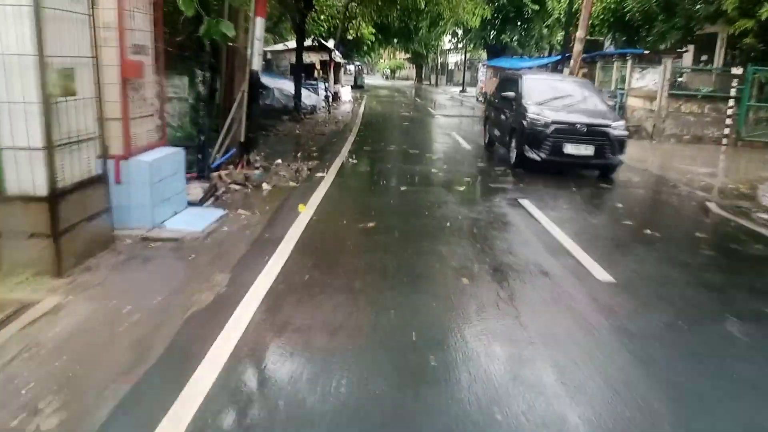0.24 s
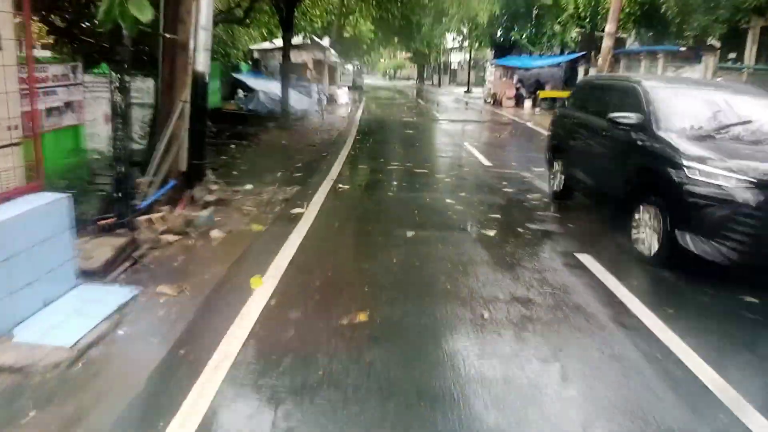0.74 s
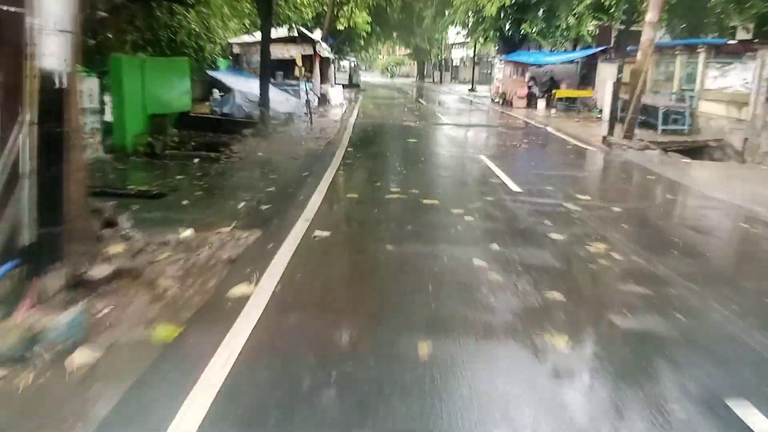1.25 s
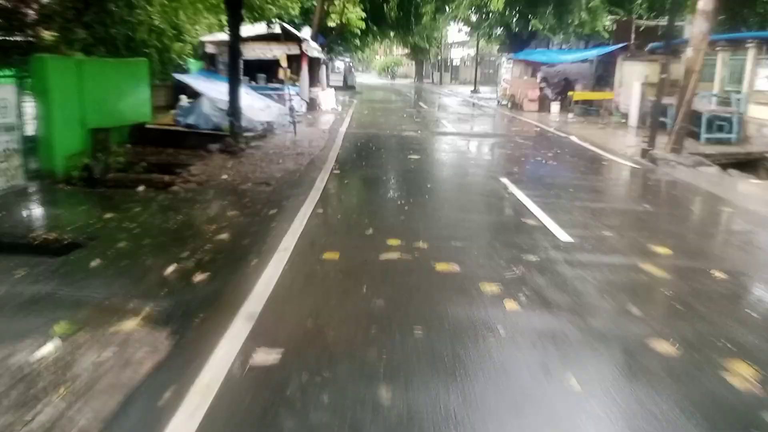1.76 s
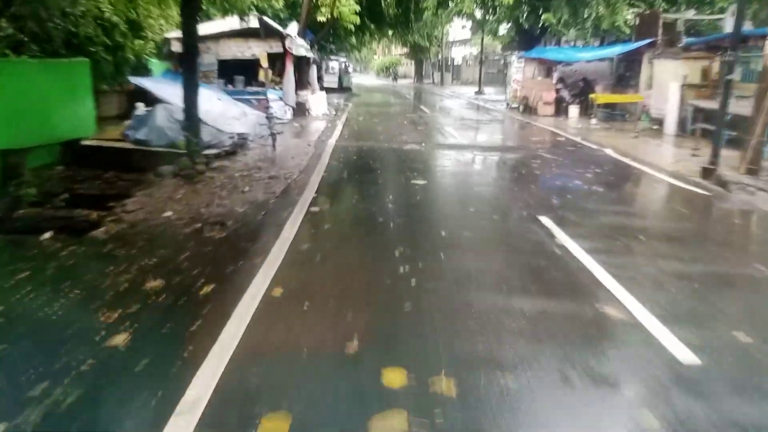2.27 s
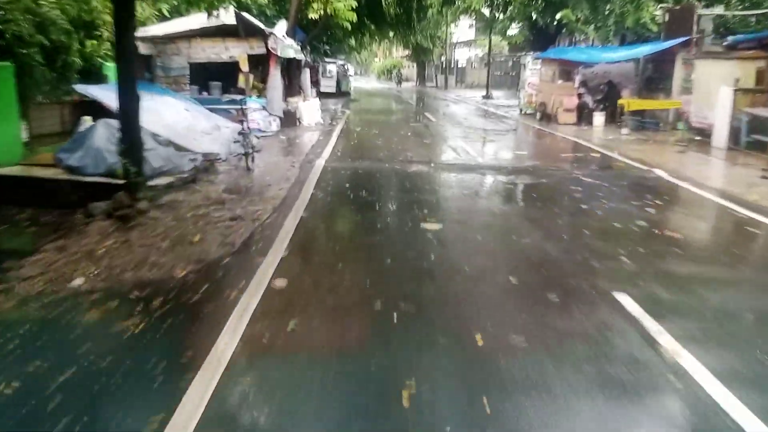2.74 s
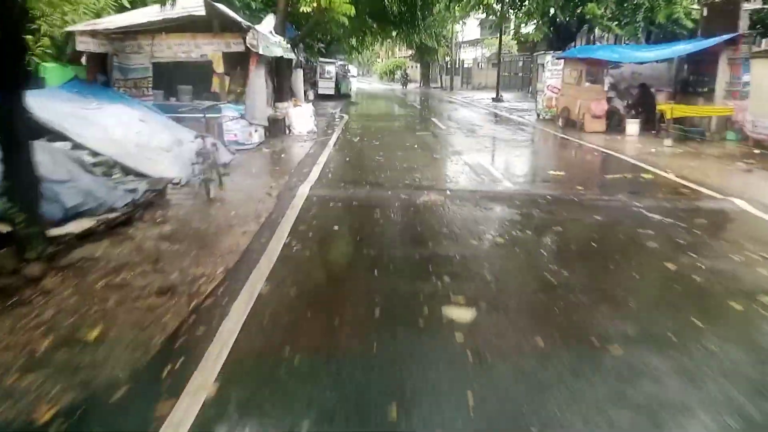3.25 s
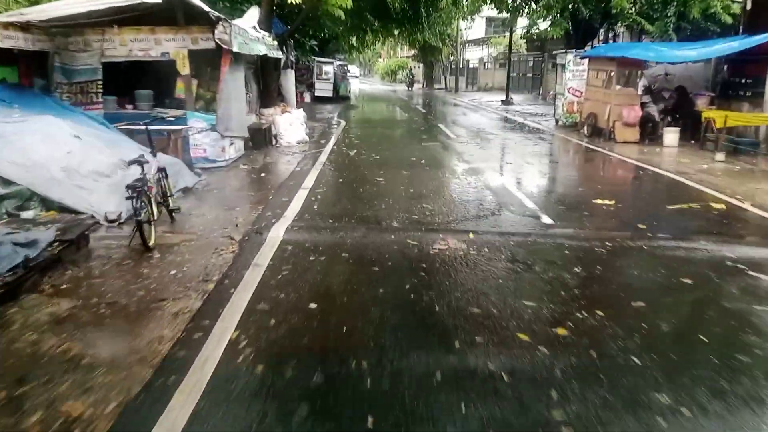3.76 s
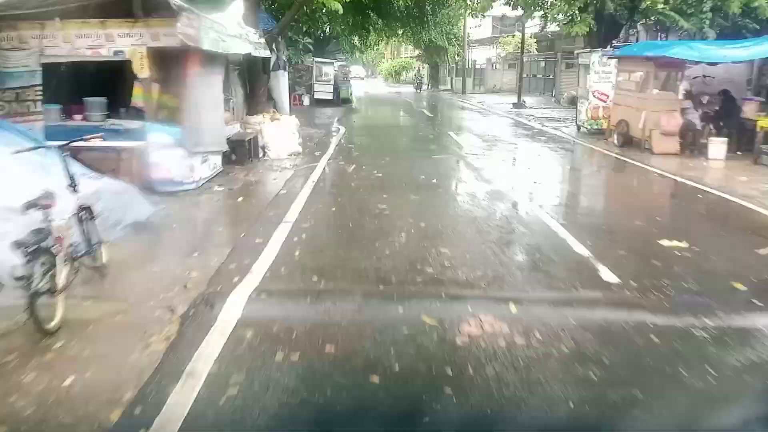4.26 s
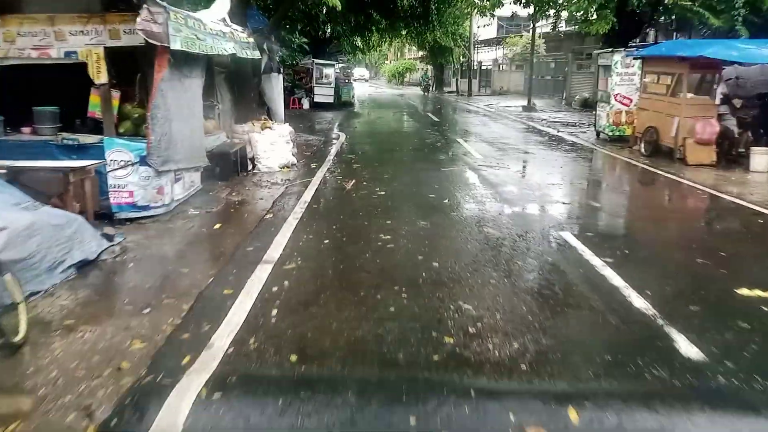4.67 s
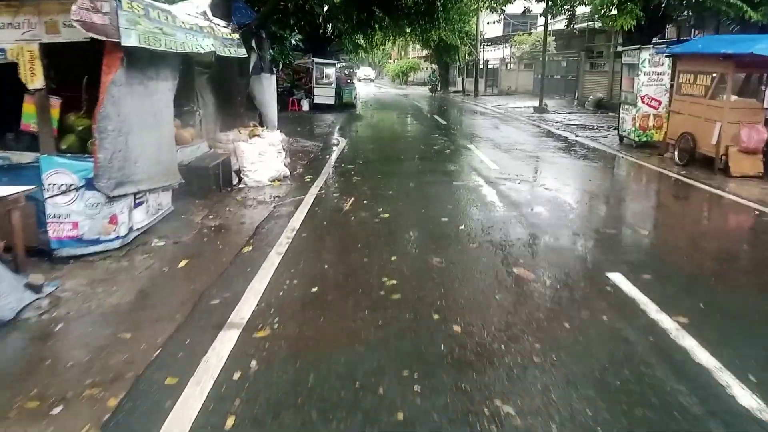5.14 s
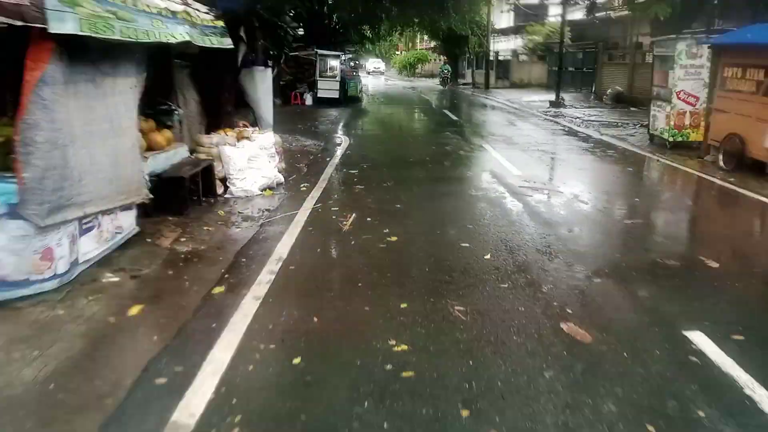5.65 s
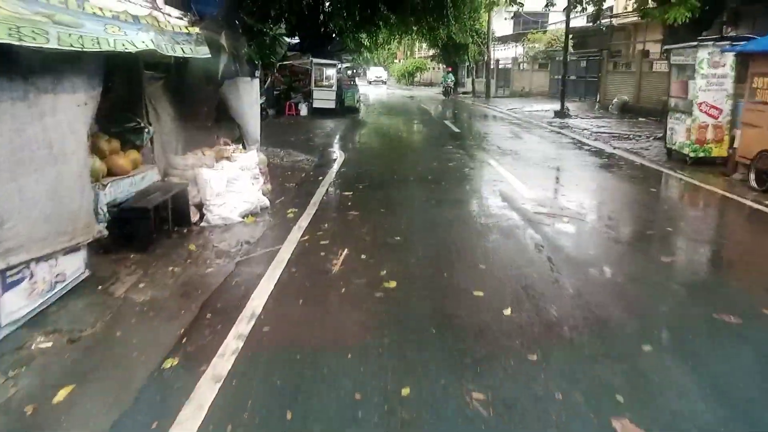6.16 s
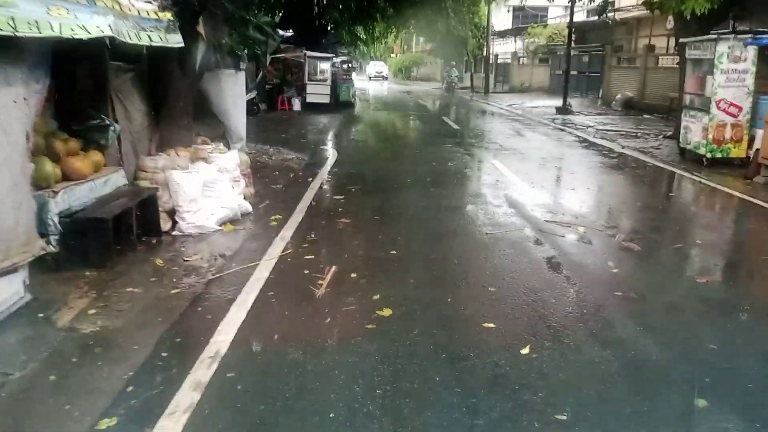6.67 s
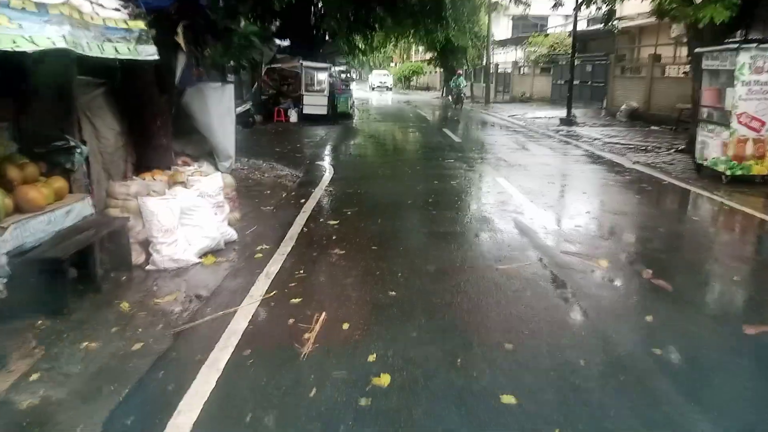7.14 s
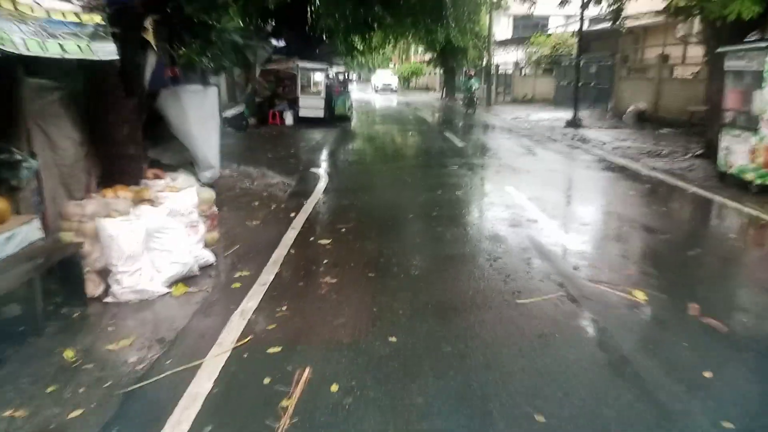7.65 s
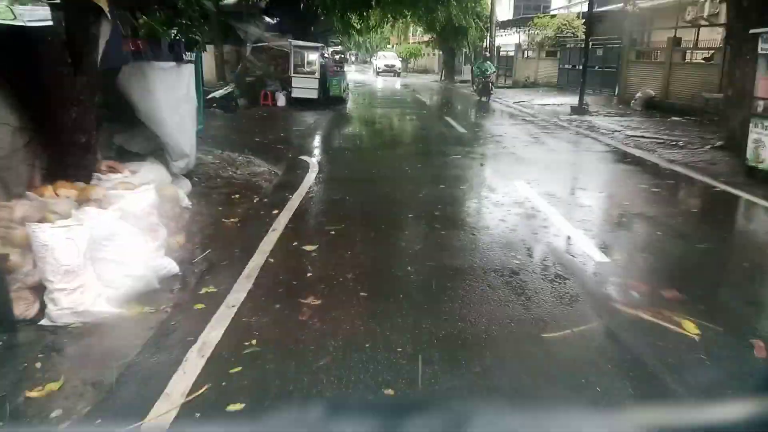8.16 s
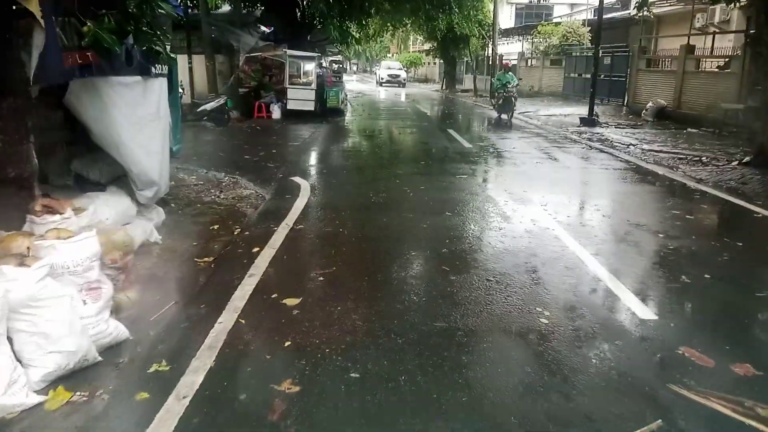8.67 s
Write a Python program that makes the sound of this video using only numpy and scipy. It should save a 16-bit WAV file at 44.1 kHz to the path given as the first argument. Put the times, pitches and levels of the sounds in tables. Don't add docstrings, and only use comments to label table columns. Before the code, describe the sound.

From inside a small vehicle behind its windscreen, a low engine drone holds steady over tyre roar and hissing spray. Heavy, dull wiper thumps mark the low stop at about 0.4, 1.7, 3.0, 4.3, 5.6, 6.9 and 8.2 seconds, with woodier double knocks at the far turn between them, from about 1.1 seconds. Around 1.4 a car passes in a short swell of wet hiss. From 2.3 the rubber judders and squeaks before each far turn, longest at 8.7. The throttle closes near 2.5; pitch falls, with a faint gear whine between 3 and 4, and the spray softens. By 5.3 the engine chugs at a lumpy idle, leaving the wiper prominent. Sparse drops tick and splash on glass and bodywork, a clearer one at 6.3, and loose trim clicks occasionally. At 8.5 the engine briefly picks up, then eases amid the last judder and splashes.

```python
import sys
import numpy as np
from scipy import signal
from scipy.fft import rfft, irfft, next_fast_len
from scipy.io import wavfile
from scipy.ndimage import uniform_filter1d

SR = 44100
rng = np.random.default_rng(int(sys.argv[2]) if len(sys.argv) > 2 else 0)


def gain_from_decibels(decibels):
    exponent = np.asarray(decibels, float) / 20
    return 10 ** exponent


def pcm_store(signal):
    levels = np.round(np.clip(np.atleast_2d(signal), -1, 1) * 32767)
    wavfile.write(sys.argv[1], SR, levels.astype(np.int16).T)


N = 392931

# time_s, level_db
TYRE_SPRAY = [(0, -50), (1.0, -48.5), (2.2, -48.5), (2.85, -51.5), (3.06, -55.5), (3.72, -57),
              (4.07, -56.5), (6.3, -57.5), (6.97, -58), (8.5, -57), (8.91, -56.5)]
# freq_hz, density_db
ROAR_SPECTRUM = [(290, -18.5), (500, 5), (620, -26), (700, -11.5), (830, -4.5), (950, -4), (1170, -5.5),
                 (1390, -3.5), (1700, -10.5), (2000, -16), (3000, -21), (3900, -53.5)]
SPRAY_SPECTRUM = [(1200, -21.5), (2000, -6.5), (2400, -4), (3100, -7), (3900, -5.5), (4700, -8), (5200, -6),
                  (6500, -4.5), (8150, -12.5), (9000, -15.5), (11000, -30.5), (13300, -54), (15500, -53)]
MIST_SPECTRUM = [(7000, -37), (9500, -0.5), (11500, -6), (13300, -8.5), (14200, -9), (14800, -1),
                 (15700, 5.5), (16500, -31.5)]
# start_s, peak_db, length_s
BIG_DROPS = [
    (0.0, -27, 0.0037),
    (0.972, -32, 0.0071),
    (3.314, -36.5, 0.026),
    (8.578, -34, 0.029),
    (8.877, -34, 0.03),
]
# freq_hz, density_db
SPLASH_SPECTRUM = [(400, 7), (1000, 20.0), (3000, 5.5), (7000, 4.5), (10000, -7.5), (13000, -29), (15500, -27)]
# start_s, peak_db, pitch_hz
SMALL_DROPS = [(0.0, -49, 12000), (.8096, -59, 9000), (.972, -51, 14000), (2.0782, -57, 9500),
               (2.3735, -49, 6000), (2.3735, -62, 13500), (3.0829, -46, 4960), (3.0829, -55, 14500),
               (3.1703, -50, 5000), (3.3384, -61.5, 10500), (4.0494, -57, 5000), (4.405, -47, 5040),
               (5.6384, -59, 12000), (5.681, -53, 8500), (5.7503, -67, 9500), (6.1789, -58, 14500),
               (6.314, -69, 12500), (6.346, -38.5, 3420), (6.348, -46, 5600), (6.347, -61, 10000),
               (6.379, -43, 5230), (6.380, -55, 9500), (7.2635, -58, 9500), (7.596, -61, 10500),
               (8.5794, -46, 14500), (8.584, -53, 14500), (8.590, -56, 14500), (1.531, -61, 11900)]
# start_s, peak_db, pitch_hz
TRIM_RATTLES = [(1.33, -35, 1870), (4.077, -46, 1750), (4.3644, -38, 1870), (4.403, -47, 1750),
                (5.1794, -41, 1460), (5.219, -39, 1300), (5.775, -59, 1590), (5.9294, -49, 2850),
                (6.0144, -44.5, 1530), (7.877, -54, 1500), (7.934, -49, 1500), (8.24, -43, 1410)]
# start_s, peak_db
LOW_STOPS = [
    (0.4368, -10.5),
    (1.7379, -10.5),
    (3.0366, -11.5),
    (4.3374, -10),
    (5.639, -8.5),
    (6.9374, -8),
    (8.237, -8),
]
# start_s, peak_db
FAR_TURNS = [(1.069, -13), (2.379, -10.5), (3.678, -11), (4.951, -14), (4.992, -11), (5.025, -22),
             (6.25, -17), (6.292, -8.5), (7.558, -8.5), (7.575, -15), (7.595, -12), (8.768, -14.5),
             (8.844, -26), (8.895, -10)]
# freq_hz, level_db, t60_s
STOP_MODES = [(157, -16, 0.09), (198.4, -0.5, 0.098), (299.4, -3.5, 0.084), (441, -2.5, 0.1),
              (600, -19, 0.034), (880, -7, 0.022)]
TURN_MODES = [(136, 5.5, 0.02), (174, -2, 0.096), (201, -1.5, 0.075), (248.4, 0, 0.08), (325, 3.5, 0.012),
              (391.2, 0, 0.094), (525, -32, 0.028), (713, -13.5, 0.013), (1106, -16.5, 0.052)]
# start_s, length_s, frame_shake_db
JUDDERS = [
    (2.27, 0.097, 1.5),
    (3.583, 0.092, 4),
    (4.8, 0.22, 5),
    (6.08, 0.22, 4.5),
    (7.386, 0.14, 7),
    (8.68, 0.38, 3),
]
# start_s, peak_db, squeak_db
BLADE_SLIPS = [(2.284, -28, -17), (3.557, -33.5, -11), (3.572, -46, -10), (3.588, -39, -5),
               (3.608, -37, -6.5), (3.617, -39, -14), (3.629, -39, -20), (4.809, -35, -23),
               (4.827, -49, -13), (4.84, -41, -7), (4.871, -32, -11), (4.889, -32, -11), (4.911, -45, -9),
               (4.927, -43, -9), (4.937, -46, -12), (4.955, -31, -22), (4.975, -32, -22), (4.984, -31, -21),
               (5.002, -31.5, -28), (6.083, -46, -5), (6.127, -42, -2), (6.158, -32, -17), (6.18, -40, -11),
               (6.252, -34.5, -16), (6.296, -34, -23), (7.403, -38, -18), (7.427, -36, -19),
               (7.45, -40, -17), (7.471, -32, -19), (7.487, -37, -18), (7.519, -43, -11), (7.533, -39, -11),
               (7.557, -40, -9), (7.574, -36, -20), (8.642, -34, -21), (8.68, -38, -10),
               (8.705, -32.5, -17), (8.727, -42, -17.5), (8.742, -34, -14), (8.768, -29.5, -15),
               (8.787, -41, -9), (8.826, -35, -9), (8.85, -31, -23), (8.871, -29, -18.5), (6.117, -51, -7),
               (6.11, -45, -20), (6.208, -45, -22)]
# time_s, firing_rate_hz
ENGINE_SPEED = [(0.0, 57.8), (1.75, 58.7), (2.25, 58.4), (2.45, 56.9), (2.8, 56.6), (3.08, 52.1),
                (3.33, 50.2), (3.87, 43.9), (4.49, 36.9), (4.9, 33.0), (5.1, 25.2), (5.3, 20.7),
                (5.65, 21.2), (6.45, 21.35), (7.0, 20.95), (7.32, 18.8), (7.6, 19.35), (8.25, 19.4),
                (8.5, 24.1), (8.62, 24.8), (8.91, 20.3)]
# time_s, boom_db, frame_shake_db, overrun_0_to_1
ENGINE_EFFORT = [(0, 1, -20, 0.07), (.8, 0.5, -19.5, 0.01), (1.5, 0.5, -21, 0), (1.75, -1, -19.5, 0),
                 (2.3, 0, -20, 0), (2.65, 4, -21, 0.47), (2.95, 3.5, -21, 1), (3.3, 3, -23.5, 0.7),
                 (3.95, 2, -21.5, 1), (4.5, -3, -23.5, 0.7), (5.0, -10.5, -23, 1), (5.05, -23.5, -28, 0.7),
                 (5.6, -15.5, -27, 0.8), (7, -16, -25.5, 0), (7.35, -23, -26.5, 0.3),
                 (8.15, -21.5, -23.5, .5), (8.5, -7.5, -23, 0.3), (8.91, -13.5, -24, .5)]
# time_s, level_db
ODD_ORDER_BITE = [(0, -1.5), (2.2, 0.5), (2.55, -20.5), (2.95, -5), (3.9, -0.5), (8.2, -1.5), (8.55, -4),
                  (8.91, 6)]
# multiple_of_firing_rate, pulling_db, overrun_db, idle_db
FIRING_ORDERS = [(1, -0.5, -2, 16), (2, -5, -3, 2.5), (2.5, -18, -26.5, -22), (3, -3.5, -2, 3),
                 (3.5, -12.5, -16, -21), (4, -8.5, -9.5, 2.5), (5, -1.5, -3.5, -5.5), (5.5, -4.5, -16, -26),
                 (6, -11, -5.5, -8), (7, -1, -6.5, -13), (8, 4.5, -13, -12), (9, -10, -17.5, -13),
                 (11, -1.5, -21, -20), (13, -4, -17.5, -20), (14, 1.5, -18.5, -23), (14.5, -2, -11, -19),
                 (17, -5, -15.5, -15), (18, -1, -19.5, -8)]
# freq_hz, gain_db
CABIN_GAIN = [(20, -44), (38, -29), (44, -22), (56, -19), (72, -39), (86, -25), (112, -20.5), (172, -27.5),
              (214, -26.5), (255, -41.5), (292, -35), (460, -49.5), (1100, -58)]
# freq_hz, width_hz, level_db
EXHAUST_MODES = [(189.6, 46, 6.5), (290.3, 8.7, 8.5), (378, 7, -12.5), (442, 9.7, -24), (570, 8.9, -21.5),
                 (601, 40, -10.5)]
# freq_hz, width_hz, level_db
SILENCER_BOOM = (102.7, 27.5, -16)
# freq_hz, density_db
SHAKE_SPECTRUM = [(30, -3), (60, -6), (100, 0.5), (160, -3), (210, -4.5), (255, -8.5), (350, -10),
                  (480, -13.5), (620, -18), (900, -29.5), (1300, -76)]
# time_s, level_db
GEAR_WHINE = [(0, -81), (2.95, -69), (3.1, -45), (3.4, -49), (3.7, -43), (3.9, -65), (8.91, -75)]

IDLE_HZ, IDLE_FADE_HZ = 25.5, 2.7
SLIP_DB, SLIP_HZ, SLIP_SNAP_DB, SLIP_SQUEAK_DB = -4.5, 1020, -1.5, 11.5


def rms_one(x):
    return x / np.sqrt(np.mean(x ** 2) + 1e-20)


def in_time(rows):
    s, *columns = np.transpose(rows)
    return [np.interp(np.arange(N) / SR, s, c) for c in columns]


def at_hz(points, hz):
    freq_hz, level_db = np.array(points).T
    return np.interp(np.log(hz), np.log(freq_hz), level_db)


def drift(rate_hz):
    r = np.exp(-80 * np.pi * rate_hz / SR)
    slow = signal.lfilter([1], [1, -2 * r, r * r], rng.standard_normal(N // 40 + 2002))[2000:]
    return np.interp(np.arange(N) / 40, np.arange(len(slow)), rms_one(slow))


def ring(clicks, hz, t60_s):
    r, w = gain_from_decibels(-60 / (t60_s * SR)), 2 * np.pi * hz / SR
    return signal.lfilter([0, np.sin(w)], [1, -2 * r * np.cos(w), r * r], clicks + 1e-18)


def resonate(x, hz, width_hz):
    r = np.exp(-np.pi * width_hz / SR)
    return signal.lfilter([(1 - r * r) / 2, 0, (r * r - 1) / 2], [1, -2 * r * np.cos(2 * np.pi * hz / SR), r * r], x)


def filtered(x, order, hz, kind="low"):
    return signal.sosfilt(signal.butter(order, hz, kind, fs=SR, output="sos"), x)


def coloured(spectrum, patchy_db, flicker_hz):
    size = next_fast_len(N)
    hz = np.maximum(np.arange(size // 2 + 1) * SR / size, 1)
    shaped = rfft(rng.standard_normal(size)) * gain_from_decibels(at_hz(spectrum, hz))
    out, together = 0, drift(flicker_hz)
    for octave in range(4, 15):
        share = np.cos(np.pi / 2 * np.clip(np.log2(hz) - octave, -1, 1)) ** 2
        flicker_db = patchy_db * (.5 * together + drift(flicker_hz))
        out = out + irfft(shaped * share, size)[:N] * gain_from_decibels(flicker_db)
    return rms_one(out)


def tyre_spray_db():
    car_s, car_db, rise_s, hold_s, fade_s = 1.417, 4, 0.037, 0.19, 0.22
    t = np.arange(N) / SR - car_s
    rise = (np.minimum(t, 0) / rise_s) ** 2
    fade = (np.maximum(t - hold_s, 0) / fade_s) ** 2
    return in_time(TYRE_SPRAY)[0] + car_db * np.exp(-rise - fade)


def road_roar(spray_db, swing_db, puff, rate_hz):
    level_db = -42.5 + 0.95 * (spray_db - TYRE_SPRAY[0][1]) + 0.25 * swing_db
    pulsing = puff ** (0.21 + 0.8 * (rate_hz < IDLE_HZ))
    return gain_from_decibels(level_db) * coloured(ROAR_SPECTRUM, patchy_db=-0.36, flicker_hz=20.0) * pulsing


def wet_hiss(spray_db):
    spray = gain_from_decibels(spray_db) * coloured(SPRAY_SPECTRUM, patchy_db=1.0, flicker_hz=61)
    mist_db = 1.87 * (spray_db + 51.0) - 72.0 + 1.1 * drift(18)
    return spray + gain_from_decibels(mist_db) * coloured(MIST_SPECTRUM, patchy_db=0.8, flicker_hz=11)


def splashes():
    swell, t = np.zeros(N + SR), np.arange(4000) / SR
    for s, level_db, length_s in BIG_DROPS:
        swell[int(s * SR):][:len(t)] += gain_from_decibels(level_db - 6.0) * np.exp(-(t / length_s) ** 2)
    return swell[:N] * coloured(SPLASH_SPECTRUM, patchy_db=0.5, flicker_hz=29)


def drops():
    length_s, width_share = 0.0026, 0.16
    out, t = np.zeros(N + SR), np.arange(600) / SR
    for s, level_db, hz in SMALL_DROPS:
        edges_hz = [hz * (1 - width_share), min(hz * (1 + width_share), 16500)]
        speck = rms_one(filtered(rng.standard_normal(len(t)), 2, edges_hz, "band"))
        out[int(s * SR):][:len(t)] += gain_from_decibels(level_db) * speck * np.exp(-(t / length_s) ** 2)
    return out[:N]


def ticks(events):
    out, t = np.zeros(N + SR), np.arange(1500) / SR
    turn = 2 * np.pi * t
    clatter = rms_one(filtered(rng.standard_normal((len(events), len(t))), 2, [450, 1300], "band"))
    for (s, level_db, hz, snap_db, squeak_db), noise in zip(events, clatter):
        low, a, b = rng.random(3)
        snap = gain_from_decibels(snap_db) * np.sin(turn * hz * (1 + 0.22 * (a - .5))) * np.exp(-t / 0.0022)
        squeak = gain_from_decibels(squeak_db) * np.sin(turn * 2290 * (1 + 0.084 * (b - .5))) * np.exp(-t / 0.0013)
        dull = gain_from_decibels(-3 + 3 * (a - .5)) * noise * np.exp(-t / 0.006)
        jolt = gain_from_decibels(0.5) * np.sin(turn * 334 * (1 + 0.4 * low)) * np.exp(-t / 0.023)
        onset = 1 - np.exp(-t / .0003)
        out[int(s * SR):][:len(t)] += gain_from_decibels(level_db + 4) * (snap + squeak + dull + jolt) * onset
    return out[:N]


def trim_rattles():
    return ticks([(s, level_db, hz, 0, -60) for s, level_db, hz in TRIM_RATTLES])


def blade_slips():
    return ticks([(s, level_db + SLIP_DB, SLIP_HZ, SLIP_SNAP_DB, SLIP_SQUEAK_DB + up_db)
                  for s, level_db, up_db in BLADE_SLIPS])


def blade_crackle():
    rate_per_s, level_db, spread_db, ring_cycles = 260, -47.5, 2, 10
    t = np.arange(N) / SR
    dragging = sum(np.exp(-((t - start - length / 2) / (0.5 * length)) ** 4) for start, length, _ in JUDDERS)
    born, size, dealt = rng.random((3, N))
    clicks = (born < rate_per_s * dragging / SR) * gain_from_decibels(level_db - spread_db * np.log(size + 1e-2))
    pitch_index = (dealt * 10).astype(int)
    pitches_hz = np.geomspace(420, 2300, num=10)
    return sum(ring(clicks * (pitch_index == k), hz, ring_cycles / hz) for k, hz in enumerate(pitches_hz))


def judder_shake_db():
    t = np.arange(N) / SR
    return sum(shake_db * np.exp(-((t - start - length / 2) / (0.55 * length)) ** 2)
               for start, length, shake_db in JUDDERS)


def knocks(events, modes, bounce_s, bounce_db, mixed, soft_hz):
    start_s, peak_db = np.array(events).T
    at = (start_s * SR).astype(int)
    out = np.zeros(N)
    for k, (hz, level_db, t60_s) in enumerate(modes):
        scatter, bounce_scatter = rng.standard_normal((2, len(at)))
        sign = (-1) ** (k if mixed else 1)
        blow = np.zeros(N + SR)
        blow[at] = sign * gain_from_decibels(peak_db + level_db - 7.0 + scatter)
        blow[at + int(bounce_s * SR)] = blow[at] * gain_from_decibels(bounce_db + 0.36 * bounce_scatter)
        out += ring(blow[:N], hz, t60_s)
    return filtered(out, 4, soft_hz)


def wiper_knocks():
    stops = knocks(LOW_STOPS, STOP_MODES, bounce_s=.0099, bounce_db=-3, mixed=False, soft_hz=620)
    turns = knocks(FAR_TURNS, TURN_MODES, bounce_s=0.00669, bounce_db=-2.5, mixed=True, soft_hz=1000)
    return stops + turns


def engine_orders(cycle, rate_hz, idling, boom_db, overrun):
    bite_db = in_time(ODD_ORDER_BITE)[0]
    out = np.zeros(N)
    for k, pull_db, coast_db, idle_db in FIRING_ORDERS:
        running_db = pull_db + (coast_db - pull_db) * overrun
        bite_share = .5 if k == 2 else float(k % 2 == 1 and k > 2)
        level_db = boom_db + at_hz(CABIN_GAIN, k * rate_hz)
        level_db = level_db + running_db * (1 - idling) + idle_db * idling + bite_db * bite_share
        level_db = level_db + 0.5 * np.sqrt(k) * drift(2.13)
        out += np.sqrt(2) * gain_from_decibels(level_db) * np.cos(2 * np.pi * k * cycle + 1.1285 * k ** 2)
    return out


def exhaust(cycle, chance, rate_hz, boom_db, thud_db):
    firings = -100 * np.diff(np.floor(cycle), prepend=0) + 1e-18
    firings = filtered(firings, 4, 560)
    uneven = firings * gain_from_decibels(.8 * chance)
    pipe = sum(gain_from_decibels(level_db) * resonate(uneven, hz, width_hz) for hz, width_hz, level_db in EXHAUST_MODES)
    can_hz, can_width_hz, can_db = SILENCER_BOOM
    can = resonate(resonate(firings * gain_from_decibels(chance), can_hz, can_width_hz), can_hz, 130)
    can_fade_db = -12 * np.clip((rate_hz - 28) / 8, 0, 1)
    return gain_from_decibels(thud_db) * rms_one(pipe) + can * gain_from_decibels(can_db + 0.59 * (boom_db + 12) + can_fade_db)


def engine(rate_hz, boom_db, overrun, thud_db, rumble_db):
    idling = np.clip(1 - (rate_hz - IDLE_HZ) / IDLE_FADE_HZ, 0, 1)
    cycle = np.cumsum(rate_hz) / SR + .003 * drift(9)
    chance = rng.standard_normal(N // 400)[cycle.astype(int) % (N // 400)]
    puff = 0.81 + (0.59 + 0.15 * idling) * gain_from_decibels(0.45 * chance) * np.exp(-3.0 * (cycle % 1))
    puff = uniform_filter1d(puff, size=150)
    shake = rms_one(puff * coloured(SHAKE_SPECTRUM, patchy_db=1.5, flicker_hz=2.8))
    whine = gain_from_decibels(in_time(GEAR_WHINE)[0]) * np.sin(2 * np.pi * 13.5 * cycle)
    motor = engine_orders(cycle, rate_hz, idling, boom_db, overrun) + whine
    motor = motor + exhaust(cycle, chance, rate_hz, boom_db, thud_db)
    return motor + gain_from_decibels(rumble_db - 7.5 + idling) * shake, puff


def scene():
    rate_hz = in_time(ENGINE_SPEED)[0]
    boom_db, frame_db, overrun = in_time(ENGINE_EFFORT)
    rumble_db, swing_db = frame_db + judder_shake_db(), frame_db - frame_db.max()
    thud_db = -42 + 0.97 * (rumble_db - frame_db.max())
    motor, puff = engine(rate_hz, boom_db, np.clip(overrun, 0, 1), thud_db, rumble_db)
    spray_db = tyre_spray_db()
    road = road_roar(spray_db, swing_db, puff, rate_hz) + wet_hiss(spray_db)
    wiper = wiper_knocks() + blade_slips() + blade_crackle()
    return (road + splashes() + drops() + trim_rattles() + wiper + motor)[None]


def suppressor(x, depth_db):
    hz, _, frames = signal.stft(x, SR, nperseg=512)
    patches = uniform_filter1d(rng.standard_normal(frames.shape), size=8, axis=-1)
    patches = rms_one(uniform_filter1d(patches, size=2, axis=-2))
    power = np.mean(np.abs(frames[..., hz > 3000, :]) ** 2, axis=-2, keepdims=True)
    level = uniform_filter1d(np.log10(power + 1e-20), size=60, axis=-1)
    quiet = 0.5 + .5 * np.clip(level.max() - level, 0, 1.2)
    reach = np.clip((hz - 500) / 1000, 0, 1)[:, None] * quiet
    return signal.istft(frames * gain_from_decibels(depth_db * patches * reach), SR, nperseg=512)[1][..., :N]


def roll_off(x):
    return signal.sosfilt(signal.butter(12, 17090, fs=SR, output="sos"), x)


def record(dry):
    x = filtered(dry, 8, 37, "high")
    x = .5 * np.tanh(suppressor(x, depth_db=2.0) / .5)
    x = signal.sosfilt(signal.cheby2(16, 60, 16120, fs=SR, output="sos"), x)
    return roll_off(x)


dry = scene()
out = record(dry)
pcm_store(out)
```